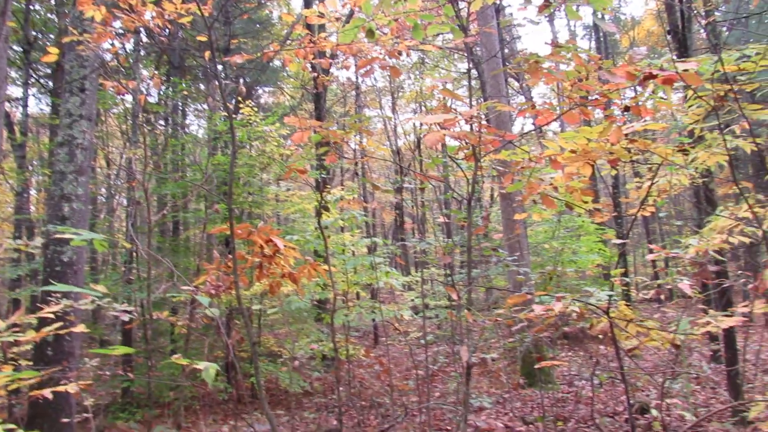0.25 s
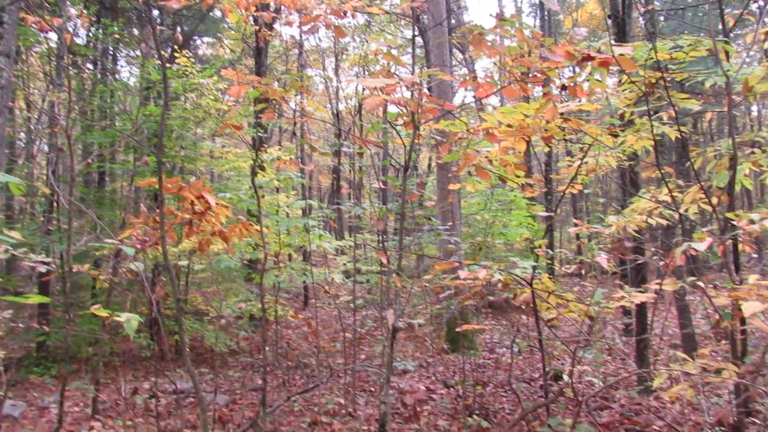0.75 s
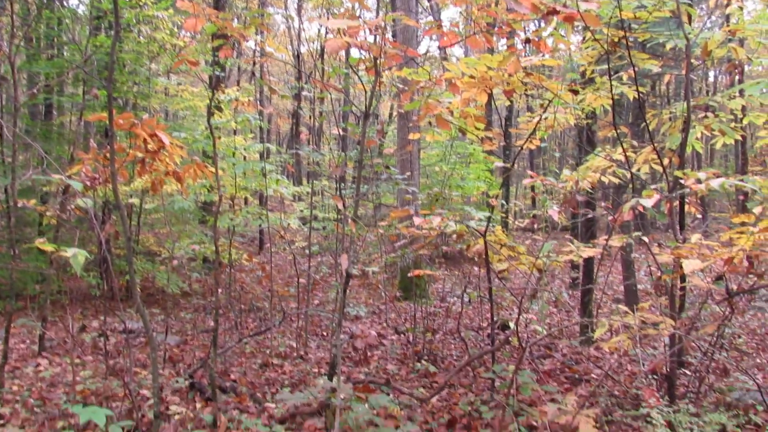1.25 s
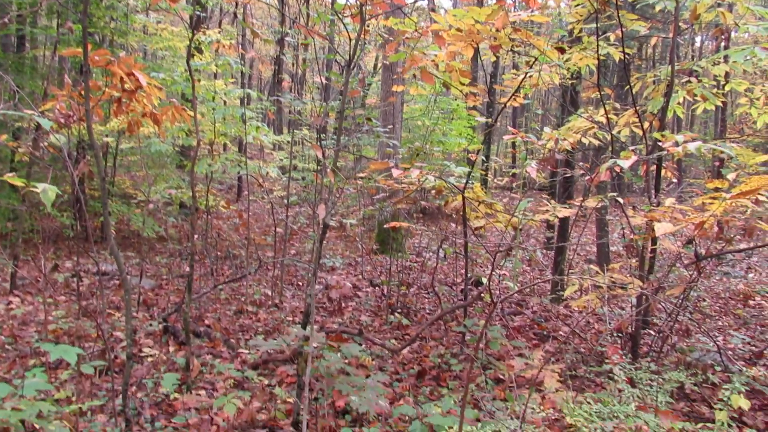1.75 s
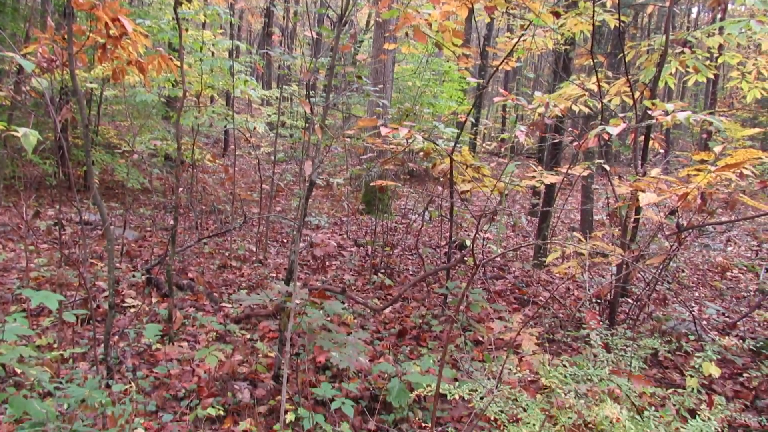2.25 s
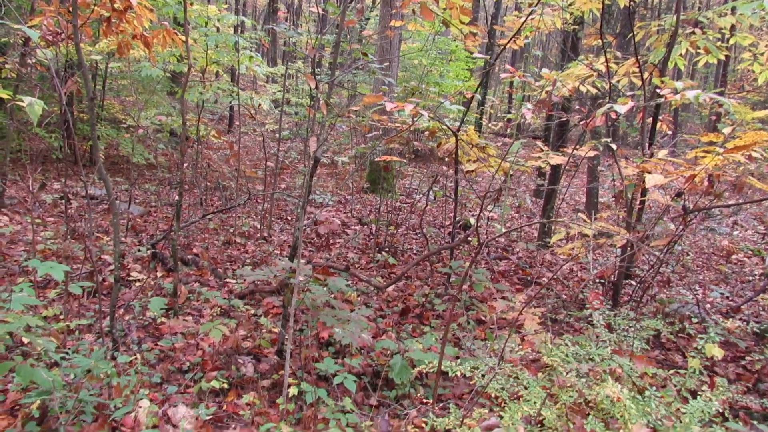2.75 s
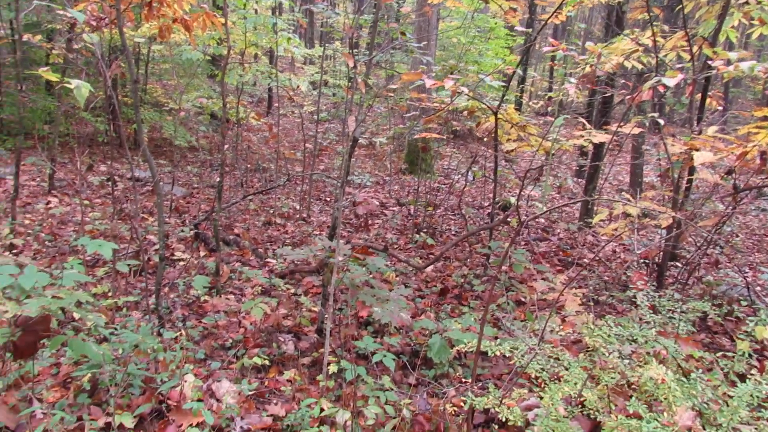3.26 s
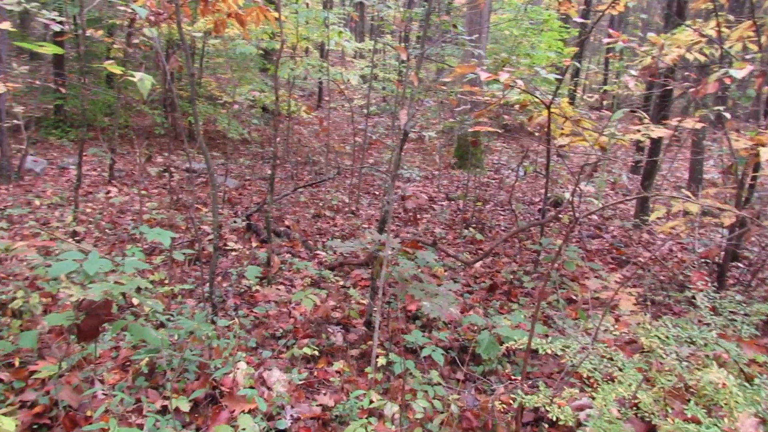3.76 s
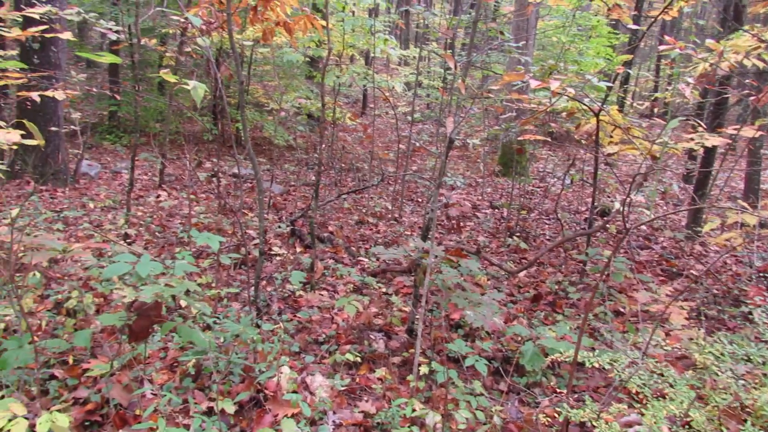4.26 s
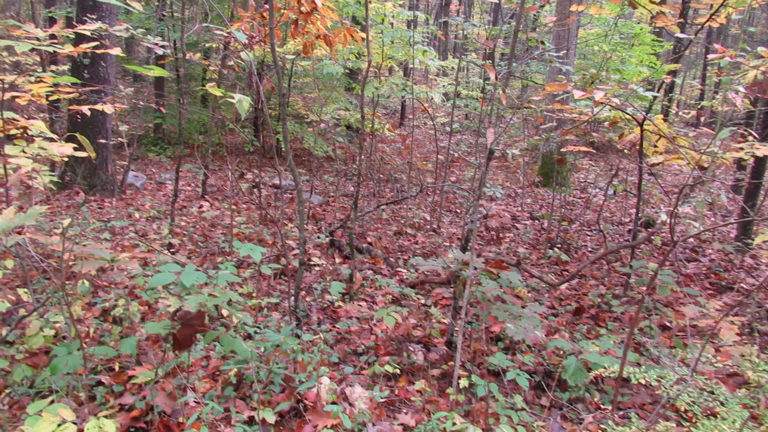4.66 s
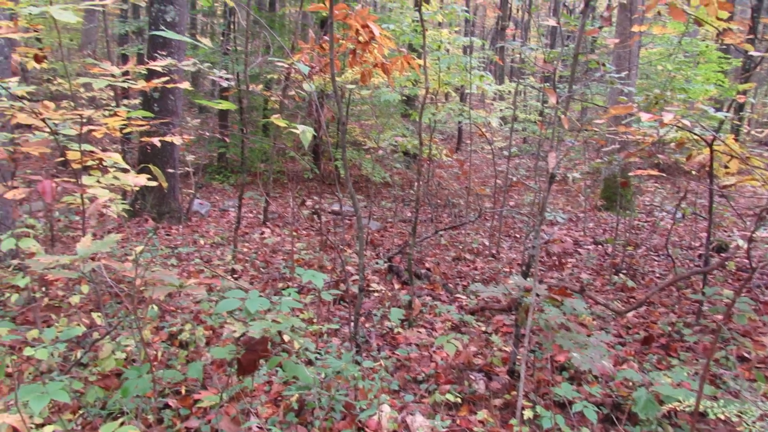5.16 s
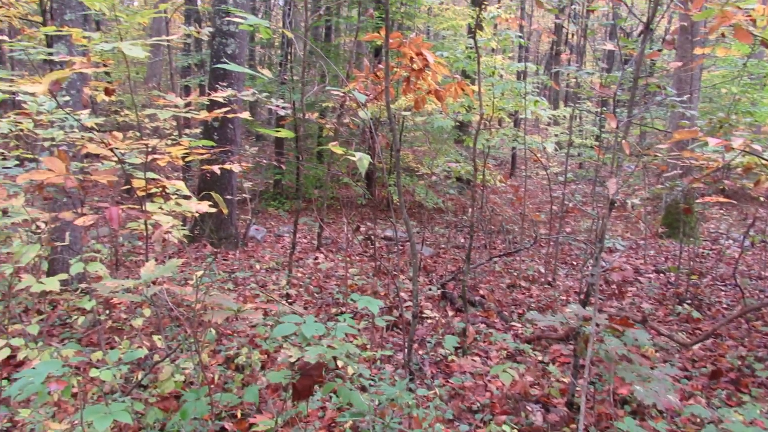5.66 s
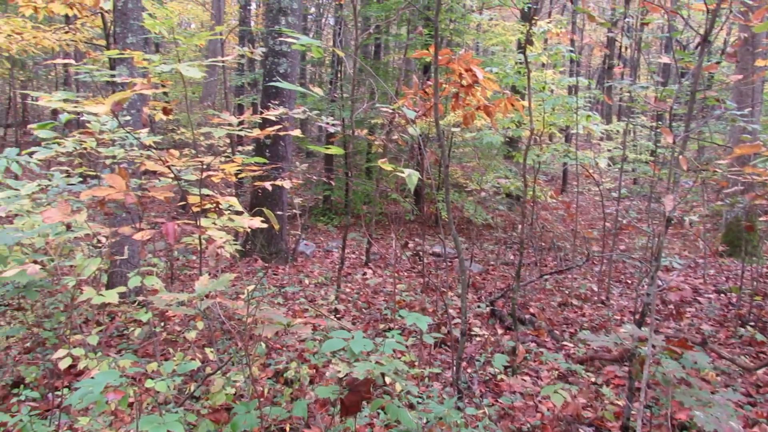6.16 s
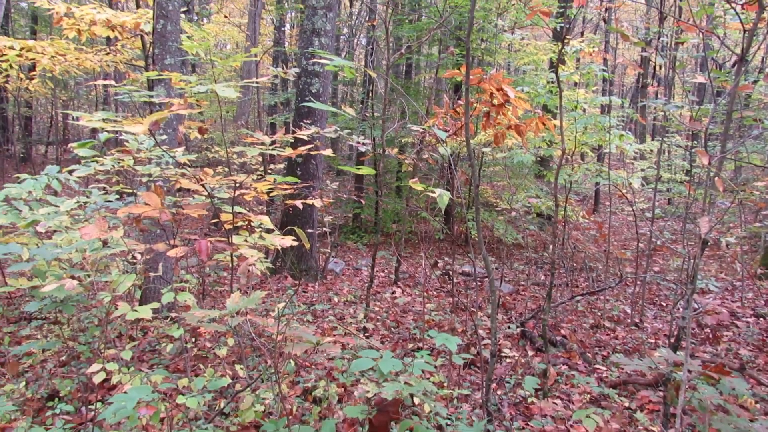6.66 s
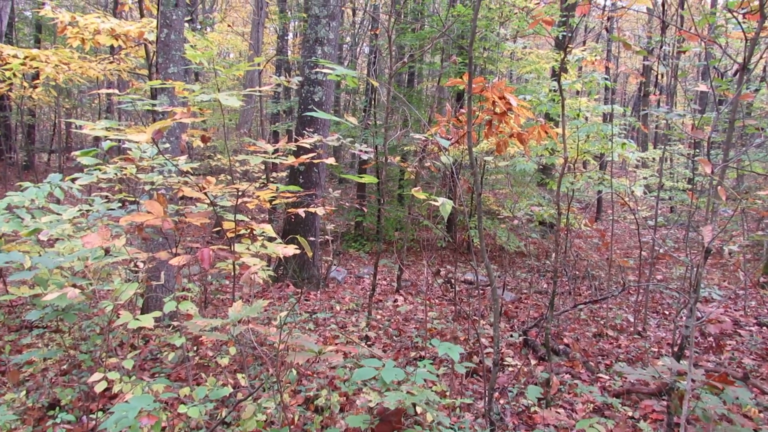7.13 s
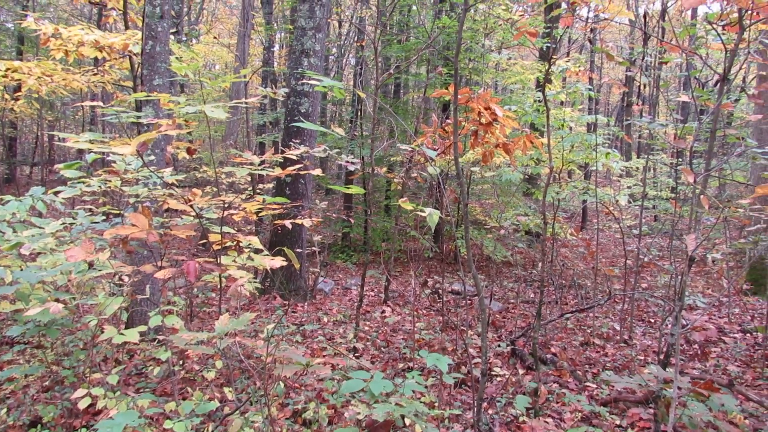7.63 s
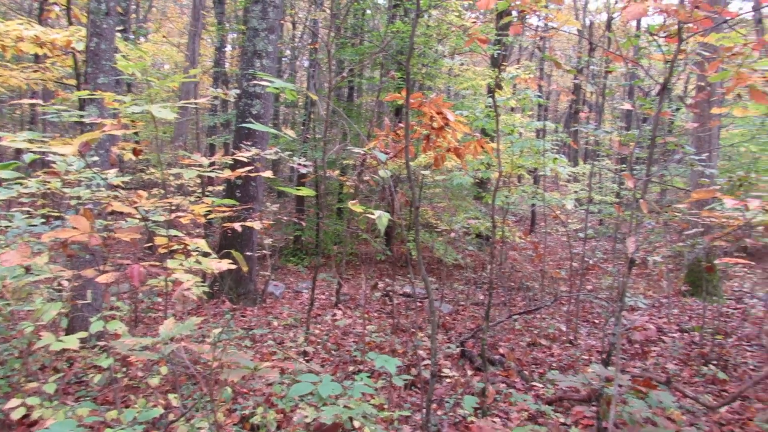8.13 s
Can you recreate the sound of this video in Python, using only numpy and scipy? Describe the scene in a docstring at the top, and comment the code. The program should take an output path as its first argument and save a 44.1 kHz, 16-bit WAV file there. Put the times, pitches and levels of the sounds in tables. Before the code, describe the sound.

A calm wood lasting about 8.4 seconds, heard in wide stereo. A soft low rumble, unsteady in its upper part, and a faint hum run throughout beneath a thin hiss that creeps up slightly. From the start, far tree frogs peep around 3.5 kHz, blurred into echo among the trunks. At 0.6 s a nearer frog, slightly left, gives a short buzzing creak breaking upward, repeating roughly every 0.7 s with one longer gap after 1.9 s; thin squeaks sometimes trail. A second frog, further left, joins at 0.8 s with brief rising whistles ending in a falling flick, clearer after 2.5 s. At 2.8 s a twig snaps once, dry and sharp, left of centre, with a faint leaf tick. Soft litter ticks return near 5.6, 6.3 and 7.1 s. From 5.3 s the near frog's whistles lengthen and clear, strongest from 6 to 7.6 s, before the background and far peeps remain.

```python
"""A low rumble, a faint hum and a slowly rising hiss, all shaped noise, run under an autumn wood.
Far tree frogs peep from the start, heard only as echo. A near frog soon joins with creaks that break
and clear into rising whistles, then a second with a rise and a falling flick: gliding tones with overtones.
Later a twig snaps once, as a burst of noise over short ringing tones, and leaf litter ticks softly, as noise.
The near frog's last calls have longer, clearer whistles."""
import sys
import numpy as np
from scipy import signal
from scipy.fft import rfft, irfft, next_fast_len
from scipy.io import wavfile
from scipy.ndimage import map_coordinates

SR = 44100
rng = np.random.default_rng(int(sys.argv[2]) if len(sys.argv) > 2 else 0)


def log_audio(samples):
    """Write samples as a 16-bit WAV file to the path given in sys.argv[1]."""
    # one column per channel
    frames = np.atleast_2d(samples).T
    # limit to full scale, then quantise
    limited = np.clip(frames, -1, 1)
    pcm = np.round(limited * 32767).astype(np.int16)
    wavfile.write(sys.argv[1], SR, pcm)


N = 369999  # length in samples


def amp(db):
    """Turn decibels into a gain."""
    return 10 ** (np.asarray(db) / 20)


def unit(x):
    """Scale to an rms (average strength) of 1."""
    return x / np.sqrt(np.mean(x ** 2) + 1e-20)


def along(points, hz):
    """Read a curve of (Hz, value) points on a logarithmic pitch axis."""
    f, v = np.transpose(points)
    return np.interp(np.log(hz + 1), np.log(f + 1), v)


def wobble(rate, size):
    """Draw a smooth random curve with this many random points a second."""
    return map_coordinates(rng.standard_normal(4096), [np.arange(size) * rate / SR], mode="wrap")


def filtered(x, response):
    """Change the strength of each frequency in x by the given response."""
    padded = next_fast_len(N + SR // 2)
    spectrum = rfft(x, padded) * response(np.fft.rfftfreq(padded, 1 / SR))
    return irfft(spectrum, padded)[..., :N]


def noise(spectrum):
    """Make coloured noise of rms 1."""
    return unit(filtered(rng.standard_normal(N), lambda hz: amp(along(spectrum, hz))))


def narrow(centre_hz, half_width_hz):
    """Make noise of rms 1 gathered around one pitch, so that it hums."""
    return unit(filtered(rng.standard_normal(N), lambda hz: 1 / (1 + ((hz - centre_hz) / half_width_hz) ** 2)))


def add(track, s, sound):
    """Mix a sound into the track at time s."""
    part = track[..., max(0, round(s * SR)):][..., :sound.shape[-1]]
    part += sound[..., :part.shape[-1]]


def pan(db):
    """Give left and right gains; a positive difference in dB favours the left."""
    return amp([[db / 2], [-db / 2]])


# How the echo among the trunks dies away. Each row: pitch in Hz, time to fall by 60 dB in seconds.
TRUNK_ECHO = [(500, 0.39), (3500, 0.84), (5000, 0.71), (9000, 0.6)]


def trees(x, early_db=-3, early_t60=0.13, stir=0.28, stir_rate=260):
    """Near trunks scatter sound quickly and the deep wood rings on, partly differently in each ear."""
    hz, t, z = signal.stft(rng.standard_normal((3, SR)), SR, nperseg=256)
    deep_wood = amp(-60 * t / along(TRUNK_ECHO, hz)[:, None])
    near_trunks = amp(early_db - 60 * t / early_t60)
    common, *ears = signal.istft(z * (deep_wood + near_trunks), SR, nperseg=256)[1]
    tail = (common + .5 * np.array(ears)) / np.sqrt(SR / 10)
    grain = unit(1 + stir * wobble(stir_rate, N))  # fast flutter smears a whistle's echo into a band
    return signal.fftconvolve(x[None], tail, axes=1)[:, :N] * grain


# Tones beside the whistle. Each row: multiple of half the whistle's pitch, relative level in dB when clear,
# relative level in dB of what a full buzz adds.
OVERTONES = [(1, -25.5, -22), (3, -25, -3.5), (4, -24, -12), (5, -29.5, -6), (6, -26, -20.5), (7, -39, -25)]
# Tones of a rough voice that repeats only every third cycle.
# Each row: pitch in thirds of the whistle's pitch, relative level in dB at roughness 1.
RASP_TONES = [(2, -6.5), (4, -2.5), (7, -0.5)]


def sac(hz, buzz, rough, overtone_db=0, jitter=0.079, shimmer_db=3.5, flutter_db=-2.0):
    """A slack vocal sac lets the odd overtones buzz; a rough throat adds bands between them."""
    half_phase = np.pi * np.cumsum(hz * (1 + jitter * rough * wobble(708, len(hz)))) / SR
    rasp = sum(amp(db) * np.sin(2 / 3 * round(k) * half_phase) for k, db in RASP_TONES)
    tone = np.sin(2 * half_phase) + rough ** 2 * rasp
    for k, clear_db, buzz_db in OVERTONES:
        shimmer = amp(overtone_db + shimmer_db * wobble(106, len(hz)))
        strength = (amp(clear_db) + buzz * amp(buzz_db)) * shimmer
        tone = tone + strength * np.sin(round(k) * half_phase)
    flutter = amp(flutter_db * rough * wobble(178, len(hz)))
    return np.sqrt(2) * tone * flutter


SCOOP_S = 0.0033  # how quickly every call's slide in from below dies away


def peep(length, from_hz, to_hz, buzz, rough, overtone_db=0, scoop_hz=180, bend=0.708, arch=0.13):
    """One plain note: the pitch scoops in from below and glides while the level arches."""
    t = np.arange(int(length * SR)) / SR
    u = t / length
    glide_hz = from_hz + (to_hz - from_hz) * u ** bend
    hz = glide_hz - scoop_hz * np.exp(-t / SCOOP_S)
    level = np.abs(np.sin(np.pi * u)) ** (arch / (1 + 2 * abs(buzz)))
    return sac(hz, buzz, rough, overtone_db) * level


# Hums and a thin whine. Each row: pitch in Hz, width in Hz, level in dB.
HUMS = [(69.9, 5.5, -61), (503.3, 24.5, -65.5), (829, 41, -74.5), (12768, 6, -99)]
# Colour of the rumble, the same in both ears, then opposed between them.
# Each row: pitch in Hz, relative level in dB per Hz.
RUMBLE_SAME = [(13, -51), (22, -15), (59, -2.5), (80, -6.5), (102, -4), (140, -6.5), (162, -8.5), (225, -7),
               (292, -8), (455, -15), (496, -11), (680, -30.5), (880, -82), (1500, -120)]
RUMBLE_OPPOSED = [(13, -47), (22, -21), (65, 1.5), (157, -1.5), (187, 1), (245, -4), (346, -5), (442, -9),
                  (510, -10), (598, -16), (680, -36), (880, -62), (1500, -120)]
# Colour of the hiss, the same in both ears, then opposed. Each row: pitch in Hz, relative level in dB per Hz.
HISS_SAME = [(420, -30), (720, 3), (818, -0.5), (882, -0.5), (964, -1), (1670, -3.5), (1820, -4),
             (2120, -5.5), (2570, -6.5), (3140, -8), (3480, -3.5), (3760, -8), (8800, -8.5), (13200, -16),
             (15000, -23)]
HISS_OPPOSED = [(420, -37), (720, -2), (860, 0.5), (1040, 0), (1430, -5.5), (2150, -14.5), (2990, -18),
                (3270, -25), (5230, -23), (5860, -16.5), (13200, -16), (15000, -36)]
# The changing level of the rumble's upper part. Each row: time in seconds, level in dB.
UPPER_RUMBLE_LEVEL = [(0.0, -59), (0.22, -52.5), (0.45, -58.5), (1.4, -62.5), (2.3, -61), (2.65, -57),
                      (3.7, -62), (4.38, -56), (4.72, -66), (4.97, -53), (5.3, -59), (7.1, -60.5),
                      (7.5, -55), (8.0, -65), (8.39, -60.0)]


def background():
    """Distant rumble and hum and the hiss of the air, from noise partly opposed between the ears to sound wide."""
    t = np.arange(N) / SR
    air = amp(-63 + 0.1317 * t)  # the hiss creeps up, in dB per second
    upper_level = amp(np.interp(t, *np.transpose(UPPER_RUMBLE_LEVEL)) + 0.3 * wobble(5.5, N))
    upper_rumble = upper_level * narrow(287, 52)
    hum = sum(amp(db) * narrow(hz, width / 2) for hz, width, db in HUMS)
    # a dip in the steady rumble leaves room for its upper part
    steady = filtered(noise(RUMBLE_SAME), lambda hz: 1 - 0.8 / (1 + ((hz - 290) / 60) ** 2))
    rumble = amp(-51.0 + 0.4 * wobble(3.12, N)) * steady
    same = rumble + upper_rumble + hum + air * amp(4.5) * noise(HISS_SAME)
    opposed = amp(-45.0 + 0.41 * wobble(2.9, N)) * noise(RUMBLE_OPPOSED)
    opposed = opposed + air * amp(3.5) * noise(HISS_OPPOSED)
    return np.array([same + opposed, same - opposed]) * pan(-0.75)


# Soft ticks in the leaf litter. Each row: start in seconds, relative level in dB.
LITTER_TICKS = [(2.764, -59), (5.632, -51.5), (6.285, -59), (7.068, -51)]
# Colour of a tick. Each row: pitch in Hz, relative level in dB per Hz.
LITTER_COLOUR = [(500, -23), (850, 4), (1800, 7), (3200, -1), (6000, -26), (12000, -28)]


def litter(t60=0.077, rise_s=0.0016):
    """Damp leaves give with short dull ticks: noise that starts softly and dies away fast."""
    touch, t = np.zeros(N), np.arange(SR // 10) / SR
    for s, db in LITTER_TICKS:
        add(touch, s, amp(db + 3.5 - 60 * t / t60) * (1 - np.exp(-t / rise_s)))
    return touch * noise(LITTER_COLOUR) * pan(-1.5)


# Snapping twigs. Each row: start in seconds, relative level in dB, left over right in dB.
TWIG_SNAPS = [(2.807, -17.5, 7.5)]
# The ringing of dry wood. Each row: pitch in Hz, relative level in dB, time to fall by 60 dB in seconds.
WOOD_RINGS = [(1220, -7.5, 0.022), (1516, -13, 0.024), (1890, -19, 0.025), (2320, -16, 0.022),
              (2660, -10, 0.026), (3120, -23, .02), (5800, -12, 0.0077), (7060, -20, 0.011),
              (8900, -4.5, 0.0072)]
# Colour of the breaking noise. Each row: pitch in Hz, relative level in dB per Hz.
FRACTURE_COLOUR = [(300, -22), (700, -16), (1100, 3.5), (2000, -4), (2900, 1), (4300, -17.5), (6500, -6.5),
                   (9500, -5), (11500, -18), (15000, -21)]


def twigs(crack_db=-3, crack_t60=.013):
    """A dry fracture rings the wood for a few hundredths of a second."""
    out, t = np.zeros((2, N)), np.arange(SR // 10) / SR
    onset = 1 - np.exp(-t / 0.00011)
    for s, db, left_db in TWIG_SNAPS:
        ring = sum(amp(level - 60 * t / t60) * np.sin(2 * np.pi * (hz * t + rng.random()))
                   for hz, level, t60 in WOOD_RINGS)
        crack = amp(crack_db - 60 * t / crack_t60) * noise(FRACTURE_COLOUR)[:len(t)]
        add(out, s, amp(db - 5.5) * pan(left_db) * (ring + crack) * onset)
    return out + amp(-17) * trees(out.mean(axis=0))


# The clearest far frogs. Each row: start in seconds, top pitch in Hz, relative level in dB before the echo.
FAR_CALLS = [(0, 3700, -60), (.48, 3630, -65), (.78, 3390, -62.5), (1.32, 3450, -59), (1.43, 3600, -59),
             (1.96, 3474, -60), (2.8, 3553, -59), (3.57, 3554, -60), (4.4, 3535, -58.5), (5.2, 3500, -59),
             (7.82, 3514, -59.5)]


def far_frogs(chorus_db=-68.0, faint_per_s=2.5, faint_db=-66, faint_top_hz=3576, faint_spread_hz=90):
    """Far calls arrive only as echo, with fainter ones at random times, over a swelling blur of noise."""
    voice = np.zeros(N)
    faint = [(N / SR * rng.random(), rng.normal(faint_top_hz, faint_spread_hz), faint_db)
             for _ in range(int(faint_per_s * N / SR))]
    for s, top_hz, db in FAR_CALLS + faint:
        add(voice, s, amp(db) * peep(0.0818, top_hz - 330, top_hz, buzz=0, rough=0.3))
    swell = amp(2.5 * wobble(4, N))
    chorus = amp(chorus_db) * swell * narrow(3330, 300)
    return amp(3) * trees(voice) + chorus


# The second frog. Each row: start in seconds, length of the rise in seconds, top pitch in Hz,
# relative level in dB.
SECOND_CALLS = [(.80, 0.048, 3390, -65), (1.303, 0.052, 3440, -56.5), (1.61, 0.099, 3510, -58.5),
                (2.477, 0.038, 3570, -52.5), (3.064, 0.036, 3610, -51.5), (3.694, 0.044, 3590, -50),
                (4.302, .052, 3570, -51), (5.108, 0.06, 3600, -51.5), (5.86, 0.058, 3630, -51)]


def second_frog(flick_db=-8, blip_db=-10):
    """A tiny high blip, a rising whistle, then a thin flick that falls back from above."""
    voice = np.zeros(N)
    for s, length, top_hz, db in SECOND_CALLS:
        blip = peep(0.0086, 4400, 4150, buzz=0, rough=.3)
        rise = peep(length, top_hz - 340, top_hz, buzz=0.23, rough=0.057, overtone_db=-8.5)
        flick = peep(0.0272, 4400, 3700, buzz=0, rough=0.28, bend=1.46)
        add(voice, s - .008, amp(db + blip_db) * blip)
        add(voice, s, amp(db) * rise)
        add(voice, s + length + .003, amp(db + flick_db) * flick)
    voice = filtered(voice, lambda hz: amp(along([(5000, -2), (8000, -12)], hz)))  # leaves take the treble
    return voice * pan(-6.5) + amp(-1) * trees(voice)


RASP_LIFT_HZ, WHISTLE_LIFT_HZ = 71, 150  # the rasp lies above the creak, the whistle above the starting pitch
SCOOP_HZ = 200  # each near call slides in from this far below
CRACK_HZ, CRACK_S, CRACK_ROUGH = 500, 0.0029, 0.91  # it cracks upward and roughens (0-1) as it ends
ATTACK_S, RELEASE_S, BLEND_S = 0.00067, 0.0015, 0.0041  # edges of a call, and the passage between stages
CREAK_SWELL_DB_PER_S, WHISTLE_FADE_DB = 45, -7  # the creak grows, the whistle sinks toward its end
WHISTLE_ARCH_DB = 2.5  # the whistle swells toward its middle
CLEAN_ROUGH, RASP_ROUGH = 0.065, .7  # roughness throughout, and what the rasp adds (0-1)
WHISTLE_BUZZ = 0.016  # buzz left in the whistle (0-1)
CREAK_SHARE = 0.337  # share of the rise covered during the creak
CLIMB_HZ_PER_S = 7230  # the whistle starts to climb this fast, then levels off at the top of its rise
CATCH_S = 0.0054  # the catch is centred this long before the whistle and lasts about this long each way


def near_call(creak_s, rasp_s, whistle_s, start_hz, rise_hz, db, gain_db, catch_db, buzz):
    """One unbroken push of air: a buzzing creak breaks into a rasp, catches, then clears into a whistle."""
    clear_s = creak_s + rasp_s
    length = clear_s + whistle_s
    t = np.arange(int(length * SR)) / SR
    # each passes from 0 to 1: into the rasp, then into the whistle
    broken, clear = ((1 + np.tanh((t - s) / BLEND_S)) / 2 for s in (creak_s, clear_s))

    creak_hz = CREAK_SHARE * rise_hz * np.sqrt(t / creak_s) + RASP_LIFT_HZ * broken
    whistle_hz = WHISTLE_LIFT_HZ + rise_hz * np.tanh(CLIMB_HZ_PER_S * (t - clear_s) / rise_hz)
    crack = np.exp((t - length) / CRACK_S)
    flicks_hz = CRACK_HZ * crack - SCOOP_HZ * np.exp(-t / SCOOP_S)
    hz = start_hz + (1 - clear) * creak_hz + clear * whistle_hz + flicks_hz

    spent = np.clip((t - clear_s) / max(whistle_s, BLEND_S), 0, 1)  # share of the whistle gone by
    whistle_db = gain_db + WHISTLE_ARCH_DB * (np.sin(np.pi * spent) - .5) + WHISTLE_FADE_DB * spent ** 4
    creak_db = CREAK_SWELL_DB_PER_S * (t - creak_s / 2)
    level_db = db + (1 - clear) * creak_db + clear * whistle_db
    level_db += catch_db * np.exp(-((t - clear_s) / CATCH_S + 1) ** 2)
    edges = np.tanh(t / ATTACK_S) * np.tanh((length - t) / RELEASE_S)

    buzzing = buzz * (1 - broken) + WHISTLE_BUZZ
    rough = CLEAN_ROUGH + RASP_ROUGH * (broken - clear) + CRACK_ROUGH * crack
    return amp(level_db) * edges * sac(hz, buzzing, rough)


# The near frog's calls. Each row: start in seconds, then creak, rasp and whistle lengths in seconds,
# starting pitch in Hz, rise in Hz, relative level in dB, extra level of the whistle in dB,
# level change at the catch in dB, buzz of the creak from 0 to 1.
CALLS = [(0.577, 0.037, 0.025, 0.01, 3180, 300, -54, 1, 3.5, 1),
         (1.245, 0.0036, 0.024, 0, 3290, 18, -54.5, 0, -4, 1),
         (1.897, 0.0362, .01, 0.015, 3214, 180, -50.5, 3.5, -2, 0.6),
         (3.332, .025, 0.014, 0.017, 3255, 90, -51, -5, -3, 0.57),
         (4.035, 0.027, 0.017, 0.018, 3216, 164, -52, 5.5, -4, .6),
         (4.639, 0.037, 0.013, 0.0054, 3280, 134, -51.5, 0, 0, .77),
         (5.316, 0.034, 0.018, 0.075, 3272, 191, -51.5, 11.5, 0, 0.65),
         (5.994, .058, 0.00073, .057, 3317, 380, -45.5, 7.5, -10, 0.12),
         (6.816, .047, 0, 0.065, 3317, 127, -47, 6, -6, 0.3),
         (7.509, 0.048, 0.0034, 0.059, 3327, 314, -44, 4, 1, 0.17)]
# Thin squeaks that trail a call or stand alone. Each row: start in seconds, length in seconds, pitch in Hz,
# glide in Hz, relative level in dB.
THIN_SQUEAKS = [(0.651, 0.034, 3745, 38, -53.5), (2.531, 0.028, 3710, -86, -49),
                (3.412, 0.022, 3900, -62, -51.5), (4.696, 0.039, 3740, 126, -47.5)]


def near_frog(treble_left_db=4.0):
    """The frog's early calls are mostly creak and rasp; in the later ones the whistle grows long and clear."""
    voice = np.zeros(N)
    for s, *call in CALLS:
        add(voice, s, near_call(*call))
    for s, length, hz, glide_hz, db in THIN_SQUEAKS:
        add(voice, s, amp(db) * peep(length, hz, hz + glide_hz, buzz=0, rough=.04))
    # the left ear gets more throughout, and the highest overtones lean furthest that way
    direct = filtered(voice, lambda hz: pan(treble_left_db) ** along([(4500, 0.49), (8000, 1)], hz))
    return direct + amp(-10) * trees(voice)


def scene():
    """The wood's background, the litter, the twig and the frogs sound together."""
    return background() + litter() + twigs() + far_frogs() + second_frog() + near_frog()


def record(dry, notch_hz=685, width_hz=45, depth=0.77, top_hz=15000):
    """The microphone has a narrow dip in the low middle and keeps nothing above its band limit."""
    return filtered(dry, lambda hz: (1 - depth * np.exp(-((hz - notch_hz) / width_hz) ** 2)) * (hz < top_hz))


dry = scene()
out = record(dry)
log_audio(out)
```